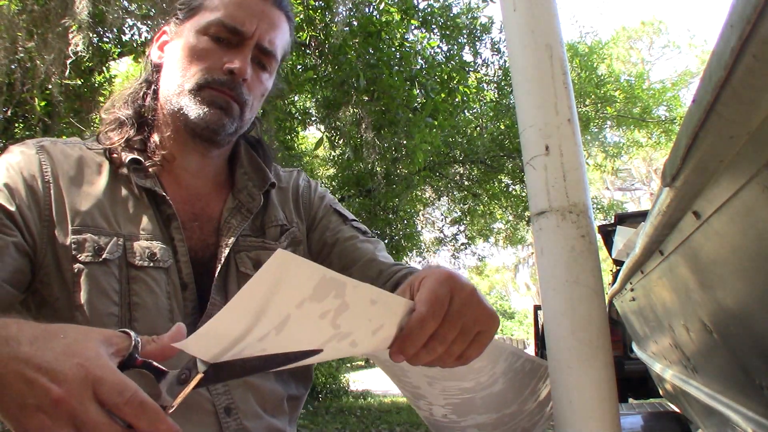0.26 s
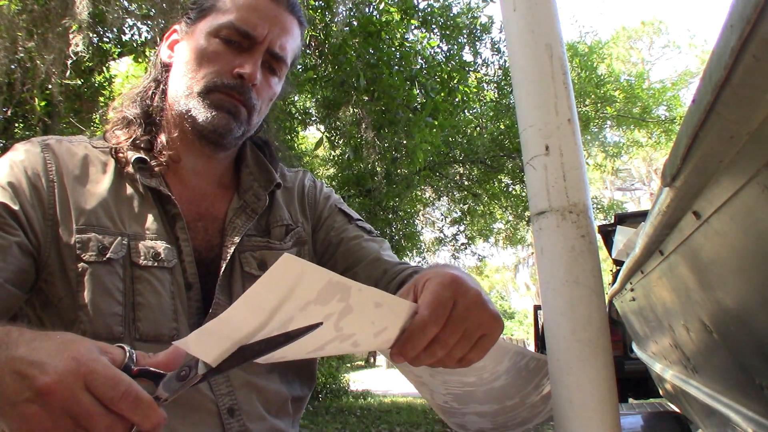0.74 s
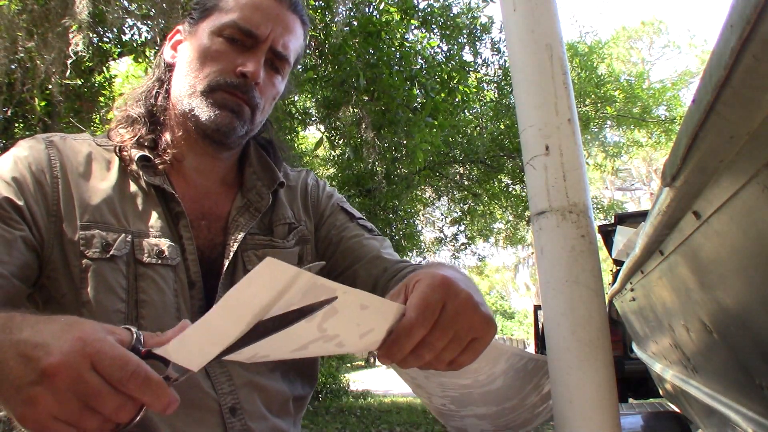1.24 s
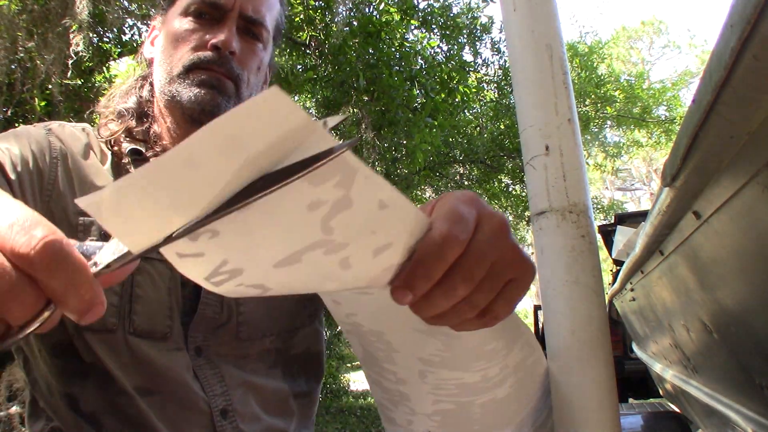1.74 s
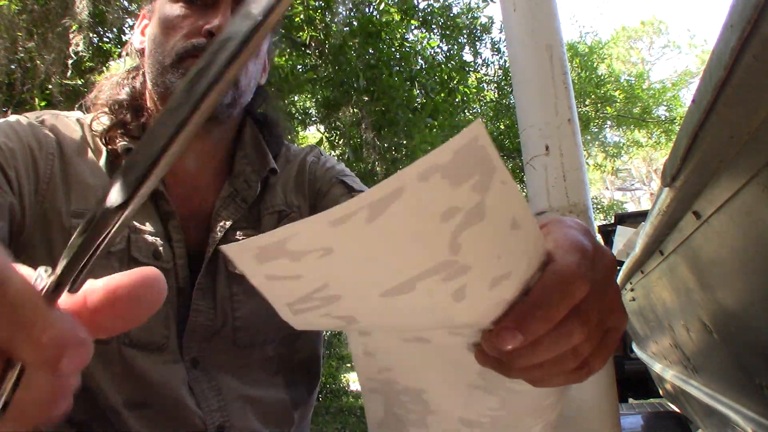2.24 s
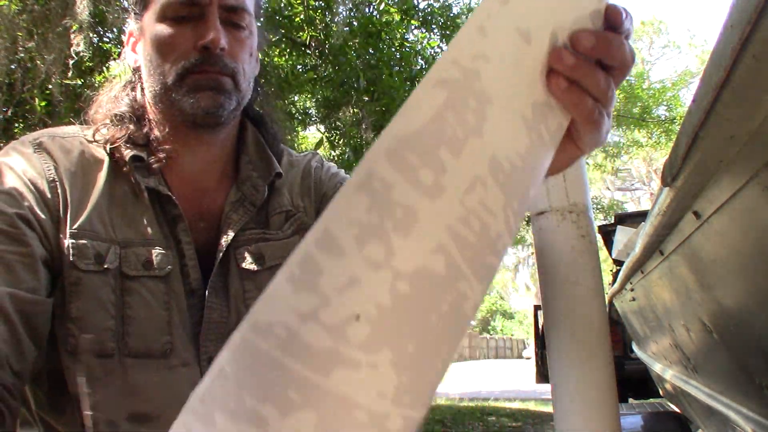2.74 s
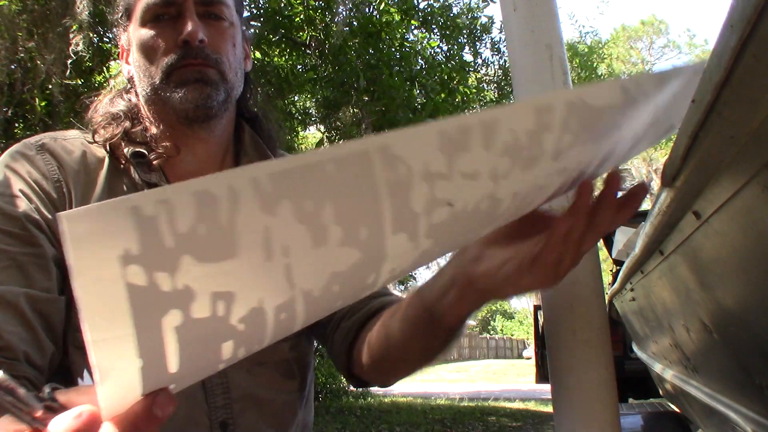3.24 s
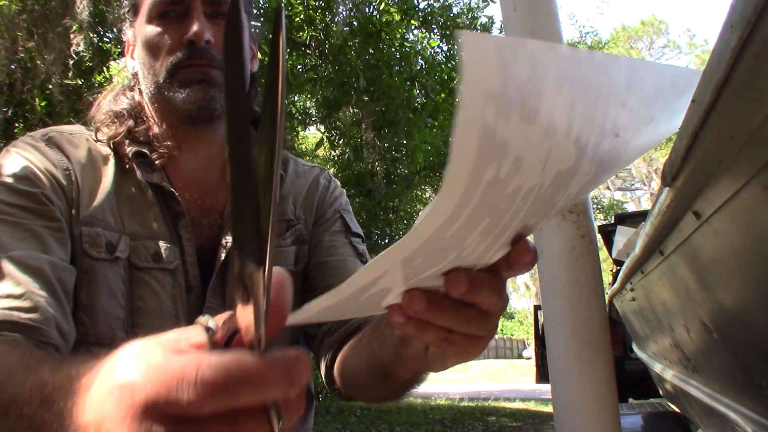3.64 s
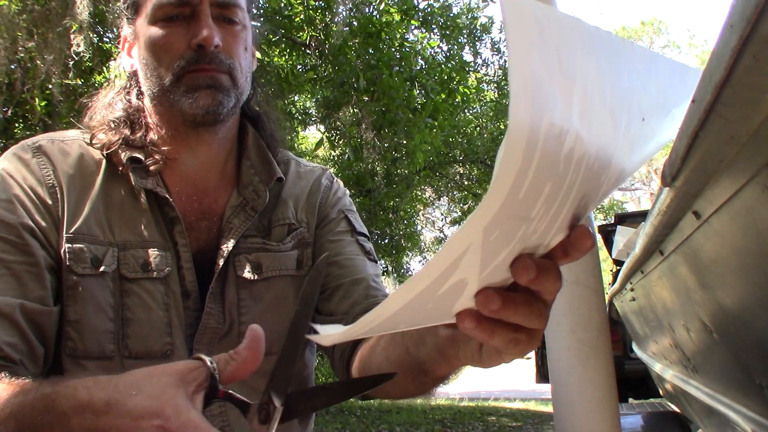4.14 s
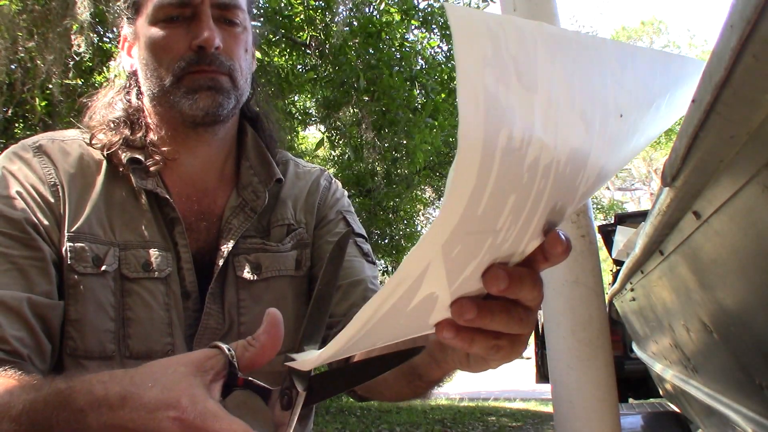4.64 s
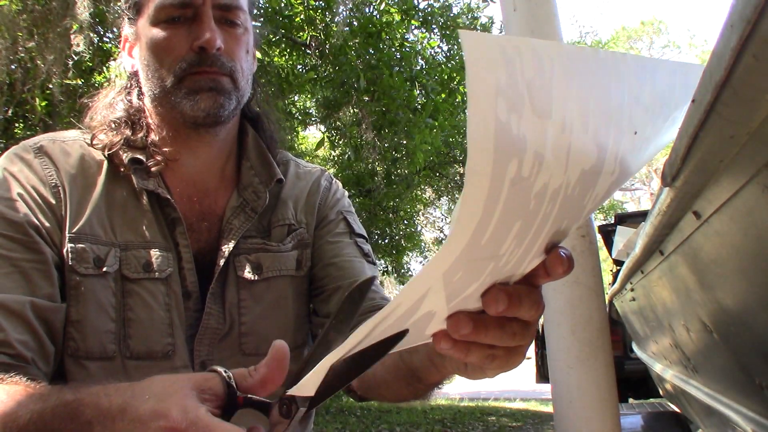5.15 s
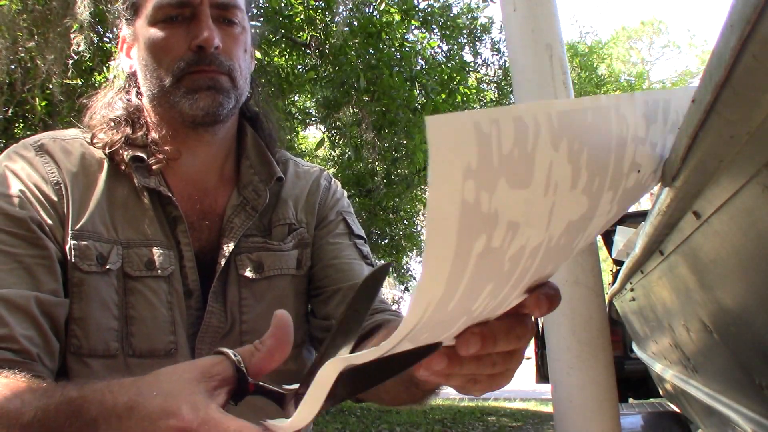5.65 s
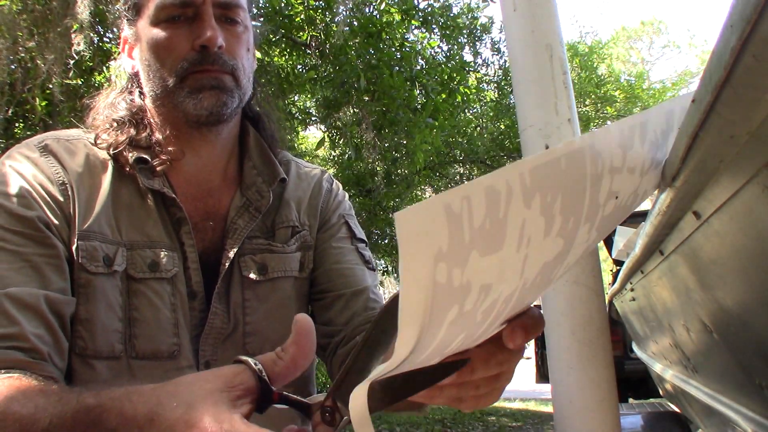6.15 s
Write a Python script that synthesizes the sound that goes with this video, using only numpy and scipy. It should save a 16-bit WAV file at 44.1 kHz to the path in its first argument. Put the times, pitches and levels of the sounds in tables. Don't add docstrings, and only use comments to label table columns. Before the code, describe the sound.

Close up outdoors, scissors tick and hiss through a stiff plastic sheet over a faint low machine hum. The sheet is gripped and swung, cracking and wobbling sharply. Just after three seconds a diesel vehicle fires up nearby, its exhaust tone climbing with valve clatter and a thin turbo whistle, while the shears resume with rasping strokes along a curled edge. The stereo recording leans left.

```python
import sys
import numpy as np
from scipy import signal
from scipy.fft import rfft, irfft
from scipy.io import wavfile
from scipy.ndimage import uniform_filter1d

SR = 44100
rng = np.random.default_rng(int(sys.argv[2]) if len(sys.argv) > 2 else 0)


def waveform_to_disk(signal):
    frames = np.transpose(np.atleast_2d(signal))
    scaled = np.clip(frames, -1, 1) * 32767
    samples = np.round(scaled).astype(np.int16)
    wavfile.write(sys.argv[1], SR, samples)


def natural_amplitude(level_db):
    exponent = np.asarray(level_db, float) / 20
    return 10 ** exponent


N = 281799
TIME = np.arange(N) / SR
HZ = np.maximum(np.arange(N // 2 + 1) * SR / N, 1)


def on_log(table):
    hz, value = np.transpose(table)
    return np.interp(np.log(HZ), np.log(hz), value)


def unit(x):
    return x / np.sqrt(np.mean(x ** 2))


def band(x, lo_hz, hi_hz):
    return signal.sosfilt(signal.butter(2, [lo_hz, hi_hz], "bandpass", fs=SR, output="sos"), x)


def colour(x, table):
    return unit(irfft(rfft(x) * natural_amplitude(on_log(table)), N))


def ring(x, modes):
    return sum(natural_amplitude(db) * signal.lfilter(*signal.iirpeak(hz, hz / width_hz, SR), x) for hz, width_hz, db in modes)


def swell(at_s, half_s):
    return np.exp(-((TIME - at_s) / half_s) ** 2)


def columns(table):
    s, *cols = np.transpose(table)
    gate = np.interp(TIME, [s[0] - .005, s[0], s[-1], s[-1] + .005], [0, 1, 1, 0])
    return gate, [np.interp(TIME, s, col) for col in cols]


def walk(rate_hz):
    hold = int(SR / rate_hz)
    steps = np.repeat(rng.standard_normal(N // hold + 1), hold)
    return 1.3 * uniform_filter1d(uniform_filter1d(steps, hold), hold)[:N]


# frequency in Hz, level in dB per Hz.
YARD_AIR = [(12, -37), (20, -11.5), (70, -6.5), (134, -3.5), (255, -10), (367, -17), (422, -22.5),
            (542, -19.5), (759, -23.5), (949, -24.5), (1090, -24.5), (2200, -29), (2750, -29.5),
            (14700, -48), (16000, -54.5)]
# frequency in Hz, likeness 0-1.
PORT_LIKENESS = [(40, .8), (130, .85), (640, .8), (3100, .65), (6800, .45), (15000, .2)]
# frequency in Hz, width in Hz, level in dB.
MACHINE_HUM = [(119.4, 2.4, -42.5), (174.7, 9.4, -54), (206, 5.7, -46.5), (235.4, 10, -47),
               (268.8, 3.7, -51)]


def yard():
    mid, side = rfft(rng.standard_normal((2, N))) * natural_amplitude(on_log(YARD_AIR))
    alike = np.clip(on_log(PORT_LIKENESS), 0, 1)
    mid, side = np.sqrt(1 + alike) * mid, np.sqrt(1 - alike) * side
    air = irfft([mid + side, mid - side], N)
    hum = 0
    for hz, width_hz, db in MACHINE_HUM:
        rough = unit(ring(rng.standard_normal(N), [(hz, width_hz, 0)]))
        hum = hum + natural_amplitude(db) * unit(1.07 * np.sin(2 * np.pi * hz * TIME) + rough)
    air_db = -34.5 - 3.5
    return natural_amplitude(air_db) * unit(air) * natural_amplitude(0.39 * walk(0.85)) + hum


# time in seconds, level in dB.
RUSTLE = [(0.0, -61), (0.42, -52.5), (0.6, -48.5), (1.1, -54.5), (1.58, -55), (2.37, -47.5), (2.47, -43.5),
          (2.85, -51), (3.4, -49)]
# frequency in Hz, level in dB.
SHEAR = [
    [(500, -40), (1000, -4.5), (1400, 4.5), (3600, 2.5), (4100, -7), (6000, -45.5)],
    [(150, -22), (400, -2), (800, 3), (1100, -4.5), (1800, -51)],
    [(2500, -73), (4300, 3.5), (5500, 5.5), (8000, 3.5), (9500, -16), (13000, -42)],
    [(6500, -42), (9000, 0), (12000, -3.5), (15500, -12), (16000, -40)],
]
# start in seconds, length in seconds, level in dB, brightness in dB.
CUTS = [(0.177, 0.049, -46, -16), (0.488, 0.099, -44.5, -6), (0.572, 0.13, -49.5, -5),
        (0.727, 0.014, -42.5, -5), (0.837, 0.057, -45.5, -3.5), (0.871, 0.098, -38, -9),
        (1.055, 0.1, -38.5, -6.5), (1.257, 0.029, -40.5, -13), (1.383, 0.023, -38.5, -11.5),
        (1.417, 0.021, -41.5, -7), (1.439, 0.032, -43, -4), (1.47, .029, -50, -3)]
# start in seconds, length in seconds, level in dB, brightness in dB.
FLEXES = [(1.979, 0.08, -34, -7), (2.03, 0.057, -27, -13), (2.089, 0.017, -25.5, -4),
          (2.151, 0.0095, -35.5, -5), (3.164, 0.017, -37, -12.5), (3.295, 0.063, -44, 3.5),
          (3.353, 0.054, -36, 3), (3.407, 0.068, -34.5, 0.5), (3.526, 0.0065, -42, 5),
          (3.59, .025, -38, -6)]
# start in seconds, length in seconds, level in dB, brightness in dB.
FLICKS = [(2.276, 0.094, -52.5, 2), (2.51, 0.0092, -32.5, -5), (2.531, 0.0068, -31.5, -2.5),
          (2.549, 0.024, -54, 11.5), (2.626, 0.018, -43, 4), (2.646, 0.064, -42, -5.5),
          (2.719, .016, -23.5, -17), (3.145, 0.012, -39, -6), (3.469, 0.047, -40, -3),
          (3.915, 0.065, -50.5, 4)]
# start in seconds, length in seconds, level in dB, brightness in dB.
TRIMS = [(5.069, 0.095, -40.5, -4.5), (5.168, 0.07, -39, -6), (5.23, 0.094, -34, -8),
         (5.426, 0.048, -38.5, -11), (5.751, 0.044, -38, 0.5), (5.776, .09, -35.5, -5.5),
         (5.979, 0.075, -39.5, -4), (6.023, 0.029, -35, -3), (6.077, 0.054, -43, -9),
         (6.232, .072, -37, -0.5), (6.299, 0.026, -51, 3.5)]
# frequency in Hz, width in Hz, level in dB.
SQUEAK = [(3470, 590, 2), (5200, 340, -2), (8100, 900, -10)]


def strokes(smooth=0.8, edge=0.27, rise=0.22):
    tick_db = 1.6 * np.minimum(rng.exponential(size=N), 3)
    ticks = (rng.random(N) < 4000 / SR) * rng.standard_normal(N) * natural_amplitude(tick_db)
    tear = (unit(ticks) + smooth * rng.standard_normal(N)) * natural_amplitude(.9 * walk(90))

    gate, (soft_db,) = columns(RUSTLE)
    power = (gate * natural_amplitude(soft_db + np.array([[0], [-9], [-9.5], [-26]]))) ** 2
    kinds = [(CUTS, -13, -18.5, .4), (FLEXES, -3.5, -14.5, 0.95), (FLICKS, -20, -12.5, 1.1), (TRIMS, -3.5, -7, 1.7)]
    for events, dull_db, air_db, air_slope in kinds:
        for s, length_s, db, bright_db in events:
            span = slice(int(s * SR), int((s + 2 * length_s) * SR))
            along = (TIME[span] - s) / length_s
            flat = np.interp(along, [0, rise, 1 - edge, 1 + edge], [0, 1, 1, 0])
            hump = np.sin(np.pi * np.clip(along / 1.14, 0, 1)) ** 0.48
            shapes = np.array([flat, flat, (flat + hump) / 2, hump])
            share_db = np.array([0, dull_db, bright_db, air_db + air_slope * bright_db])
            power[:, span] += (shapes * natural_amplitude(db + share_db)[:, None]) ** 2

    out = unit(ring(rng.standard_normal(N), SQUEAK)) * natural_amplitude(-35.5) * swell(2.297, 0.014)
    for range_power, table in zip(power, SHEAR):
        patches = natural_amplitude(1.5 * walk(150))
        out = out + np.sqrt(range_power) * patches * colour(tear, table)
    return out


# time in seconds, peak in dB, ring in Hz.
CLICKS = [
    (0.362, -34, 1970),
    (0.381, -46, 501),
    (2.1, -10, 2800),
    (2.533, -23, 2100),
    (2.561, -26, 500),
    (2.568, -28, 525),
]
# time in seconds, peak in dB, ring in Hz.
SNAPS = [(0.886, -24, 3000), (0.987, -21, 1360), (1.051, -25, 1570), (1.113, -22, 640), (1.249, -8.5, 630),
         (1.423, -22, 3260), (1.996, -12, 740), (2.02, -12, 1210), (2.034, -4, 1700), (2.07, -5, 1240),
         (2.091, -9.5, 853), (2.096, -5, 960), (2.154, -13.5, 1430), (2.277, -25, 1100),
         (2.484, -15.5, 1250), (2.512, -13, 1270), (2.665, -23, 1800), (2.695, -21, 1620),
         (2.725, -13, 2430), (2.769, -10.5, 826), (2.782, -19, 1290), (3.074, -30, 883), (3.169, -16, 1950),
         (3.34, -14.5, 1350), (3.355, -10, 957), (3.366, -9, 990), (3.421, -11, 662), (3.456, -8, 1210),
         (3.528, -9, 1280), (3.596, -17, 1370)]
# time in seconds, level in dB, frequency in Hz, T60 in seconds.
WOBBLES = [(1.251, -25, 583, 0.056), (2.036, -14, 337, 0.017), (2.092, -15.5, 295, 0.03),
           (2.541, -25, 514, 0.049), (2.544, -21.5, 136.5, 0.19), (2.556, -21, 192, 0.091),
           (2.571, -29, 245, 0.087), (2.095, -18, 556, .025), (3.357, -23, 520, 0.034), (4.0, -36, 30, .2),
           (6.095, -22, 550, 0.027)]


def snaps(crack_s=0.00056):
    out, t = np.zeros(N + 9000), np.arange(9000) / SR
    kick = band(band(1. * (t == 0), 410, 3900), 250, 5100)
    for events, t60_s, crack_db in [(SNAPS, 0.024, -29), (CLICKS, 0.047, 5)]:
        fade = natural_amplitude(-60 * t / t60_s)
        for s, db, hz in events:
            tone = 0.39 * np.sin(2 * np.pi * hz * t) * fade ** 2
            rough = 0.5 * band(rng.standard_normal(len(t)), 0.5 * hz, 2 * hz) * fade
            crack = band(rng.standard_normal(len(t)), 2200, 11400) * np.exp(-t / crack_s)
            snap = tone + rough - 3.6 * kick + 0.84 * natural_amplitude(crack_db) * crack
            out[int((s + .0013) * SR):][:len(t)] += natural_amplitude(db) * snap
    for s, db, hz, t60_s in WOBBLES:
        out[int(s * SR):][:len(t)] += natural_amplitude(db - 60 * t / t60_s) * np.sin(2 * np.pi * hz * t)
    return out[:N]


# frequency in Hz, width in Hz, level in dB.
PIPE = [(56, 16, -32), (71.8, 15, -37), (92, 6.8, -24), (100.4, 5.1, -28.5), (108, 12, -38),
        (126, 19, -26.5), (158.6, 13, -23.5), (172.4, 20, -31.5), (193.9, 13, -22.5), (230, 22.5, -29.5),
        (275, 15, -41), (300.7, 25, -25), (322, 16, -34.5)]


def pipe(hz):
    return np.sqrt(sum((natural_amplitude(db) / (1 + (2 * (hz - f) / width_hz) ** 2)) ** 2 for f, width_hz, db in PIPE))


def lines(hz, orders, gains, wobble=.0025, flutter_db=1.2):
    turns = np.cumsum(hz * (1 + wobble * walk(25))) / SR
    out = 0
    for order, gain in zip(orders, gains):
        tone = np.sin(2 * np.pi * (order * turns + rng.random()))
        out = out + gain * natural_amplitude(flutter_db * walk(18)) * tone
    return np.sqrt(2) * out, turns


# time in seconds, firing rate in Hz, effort in dB.
REVS = [(3.27, 53.09, -6), (3.32, 56.67, -7), (3.5, 71.32, 2.5), (3.7, 80, -2.8), (4.0, 88.53, -0.5),
        (4.25, 92.22, 1.3), (4.65, 96.17, 1.2), (5.0, 98.6, 0.5), (5.3, 101.3, -13.5), (5.85, 107.2, -8.5),
        (6.39, 108.6, -3.5)]
FIRING_DB = [0, -.1, -7]
UNEVEN_DB = [-10, -10, -12, -20.5]


def exhaust():
    gate, (hz, effort_db) = columns(REVS)
    crank_hz = hz / 3
    even, odd = [3, 6, 9], [4, 5, 7, 8]
    up = np.clip((hz - 88) / 4, 0, 1)
    gains = [natural_amplitude(effort_db + db) * pipe(k * crank_hz) for k, db in zip(even, FIRING_DB)]
    gains += [up * natural_amplitude(db) * pipe(k * crank_hz) for k, db in zip(odd, UNEVEN_DB)]
    tones, turns = lines(crank_hz, even + odd, gains)
    firing_phase = 3 * turns % 1
    return uniform_filter1d(gate, size=2000) * tones, hz, firing_phase


# time in seconds, half-length in seconds, turn rate in Hz, climb in Hz per s, level in dB.
SHAFTS = [
    (3.951, 0.26, 97.45, 16, -31),
    (5.548, 0.28, 64.5, 4, -27),
    (6.285, 0.31, 67.9, 4.4, -29.5),
]
SHAFT_ORDERS_DB = [0, -7, -23.5]


def shafts():
    out = 0
    for s, half_s, hz, climb, db in SHAFTS:
        tones, _ = lines(hz + climb * (TIME - s), [2, 3, 4], natural_amplitude(np.array(SHAFT_ORDERS_DB)))
        out = out + natural_amplitude(db) * swell(s, half_s) * tones
    return out


# time in seconds, half-length in seconds, frequency in Hz, width in Hz, level in dB.
PANELS = [(3.9, 0.11, 139, 7.4, -36), (5.0, 0.26, 1003, 180, -50), (5.9, 0.33, 1480, 310, -41.5),
          (3.63, 0.09, 322, 35, -34.5), (3.8, 0.69, 762, 34, -49), (4.05, 0.29, 2310, 140, -44),
          (4.55, 0.26, 347, 16, -48), (4.7, 0.73, 2930, 150, -46.5), (5.5, 0.32, 2880, 340, -43),
          (5.45, 0.28, 5170, 400, -47), (5.6, 0.29, 575.3, 51, -46)]


def panels():
    shake = rng.standard_normal(N)
    return sum(natural_amplitude(db) * swell(s, half_s) * unit(ring(shake, [(hz, width_hz, 0)]))
               for s, half_s, hz, width_hz, db in PANELS)


# frequency in Hz, width in Hz, level in dB.
RUMBLE = [(60, 40, -8), (123, 21, 2), (183, 110, 19), (235, 52, -12), (280, 41, -1.5), (313, 23, -6)]
# frequency in Hz, width in Hz, level in dB.
BLOCK = [(800, 140, 2), (1100, 1900, 1), (1480, 520, 2), (2220, 730, -5.5), (3100, 960, -0.5),
         (4160, 660, 6.5)]
# frequency in Hz, level in dB.
VALVES = [(2500, -44), (4500, 1), (5500, 2), (8000, -4), (10000, -21), (14000, -49)]


def engine():
    tones, hz, phase = exhaust()
    start_s, catch_s = 3.25, 0.25
    since = np.maximum(TIME - start_s, 0)
    catch = np.exp(-((since - catch_s) / 0.17) ** 2)
    rumble_db = -33 + 5 * catch - 1.02 * since + 1.0 * walk(10)
    rumble = unit(band(ring(rng.standard_normal(N), RUMBLE), 35, 347))
    rumble = rumble * natural_amplitude(rumble_db) * np.minimum(since / 0.029, 1)

    puff = 2.2 + np.exp(-phase / 0.72)
    block, valves = rng.standard_normal((2, N)) * puff * natural_amplitude(.7 * walk(25))
    clatter = unit(band(ring(block, BLOCK) + 0.1 * block, 350, 3150))
    clatter = clatter + natural_amplitude(-9.5) * colour(valves, VALVES)
    clatter = clatter * natural_amplitude(-37) * (hz / 100) ** 1.4 * np.minimum(since / catch_s, 1)
    return tones + shafts() + panels() + rumble + clatter


# time in seconds, frequency in Hz, level in dB.
TURBO = [(3.5, 4150, -48), (3.95, 4250, -44.5), (4.2, 4620, -46), (4.5, 5600, -51), (5, 7300, -54),
         (5.3, 8250, -52), (5.65, 9150, -55), (6, 9900, -60), (6.39, 10300, -63)]


def turbo():
    gate, (hz, db) = columns(TURBO)
    spin = np.exp(2j * np.pi * np.cumsum(hz * (1 + .008 * walk(30))) / SR)
    flow = uniform_filter1d(uniform_filter1d(rng.standard_normal((2, N)), size=75), size=75)
    whistle = unit(flow[0] * spin.real + flow[1] * spin.imag)
    return gate * natural_amplitude(db - 2.5 + 1.5 * walk(12)) * whistle


def scene():
    tail = band(rng.standard_normal((2, 4000)) * natural_amplitude(-60 * np.arange(4000) / SR / 0.049), 550, 15600)
    tail = tail / np.sqrt(np.sum(tail[0] ** 2))
    near = strokes() + snaps() + engine() + turbo()
    echoes = signal.fftconvolve(near[None], tail, axes=1)[:, :N]
    return near + natural_amplitude(-8.5) * echoes + yard()


def top_cut(x):
    return signal.sosfilt(signal.butter(12, 16510, fs=SR, output="sos"), x)


# frequency in Hz, left minus right in dB.
LEFT_OVER_RIGHT = [(60, 9.5), (110, 9.5), (200, 8.0), (380, 9.0), (700, 8.5), (1290, 7.5), (2380, 6.0),
                   (4400, 3.5), (8120, 2.5), (15000, 2.0)]
# frequency in Hz, phase in radians.
LEFT_LEAD = [(100, -0.44), (1500, -0.67), (2500, -0.15), (3300, -0.74), (4500, -0.38), (7300, 0.29),
             (10000, -1.16), (12000, 0.97)]


def record(dry):
    right = natural_amplitude(-on_log(LEFT_OVER_RIGHT)) * np.exp(-1j * on_log(LEFT_LEAD))
    ports = 2 * np.array([np.ones(len(HZ)), right]) / np.abs(1 + right) * (HZ < 15850)
    return top_cut(irfft(rfft(dry) * ports, N))


dry = scene()
out = record(dry)
waveform_to_disk(out)
```